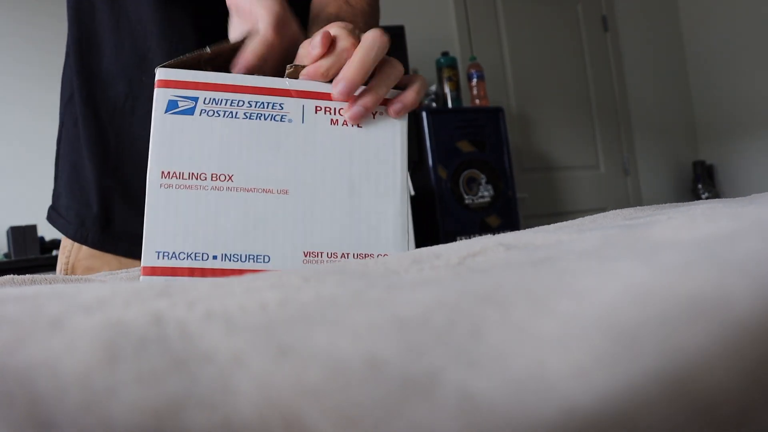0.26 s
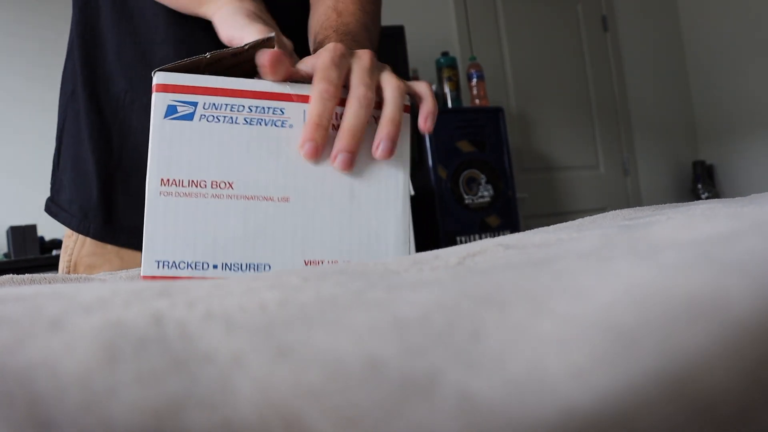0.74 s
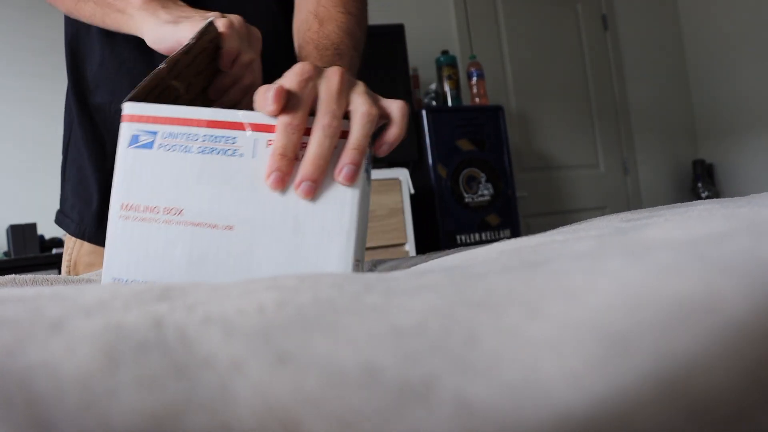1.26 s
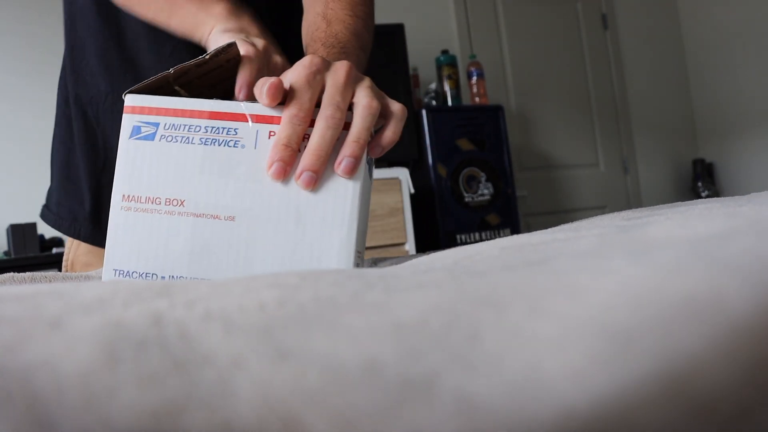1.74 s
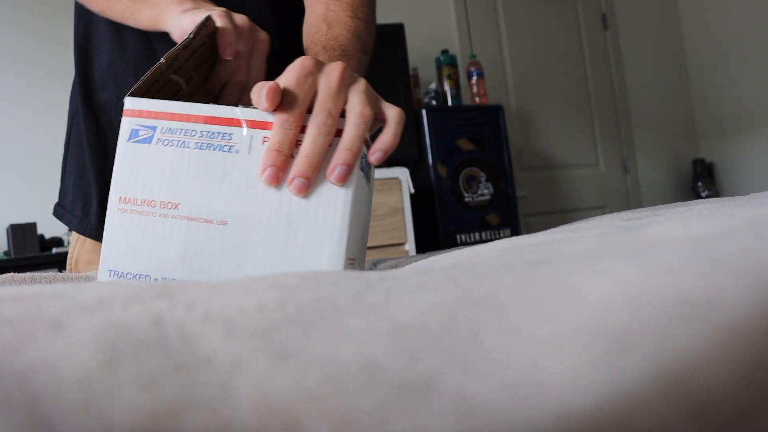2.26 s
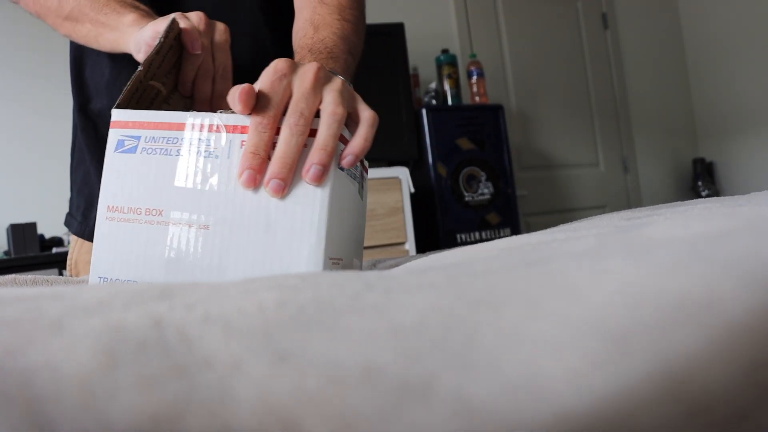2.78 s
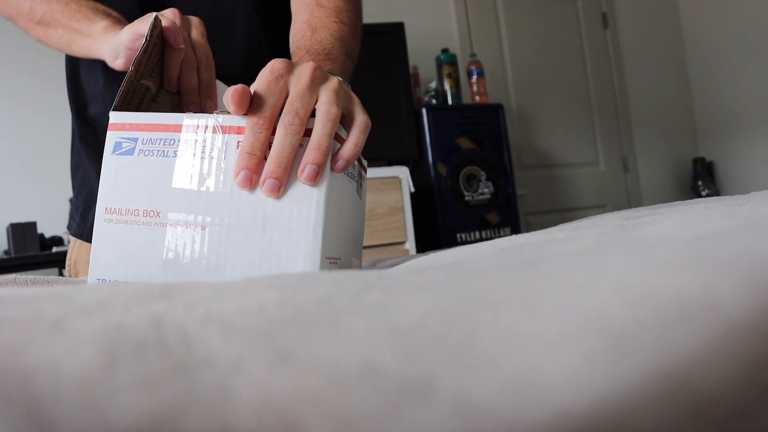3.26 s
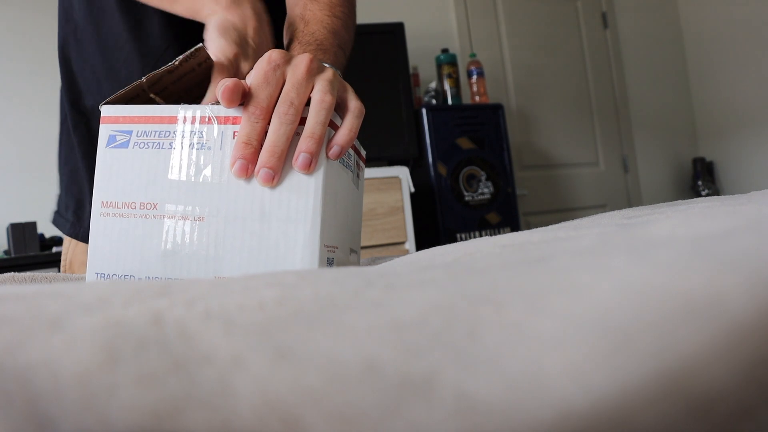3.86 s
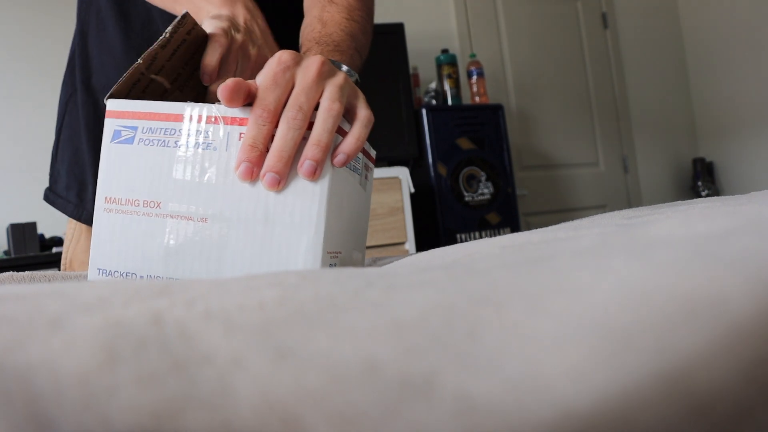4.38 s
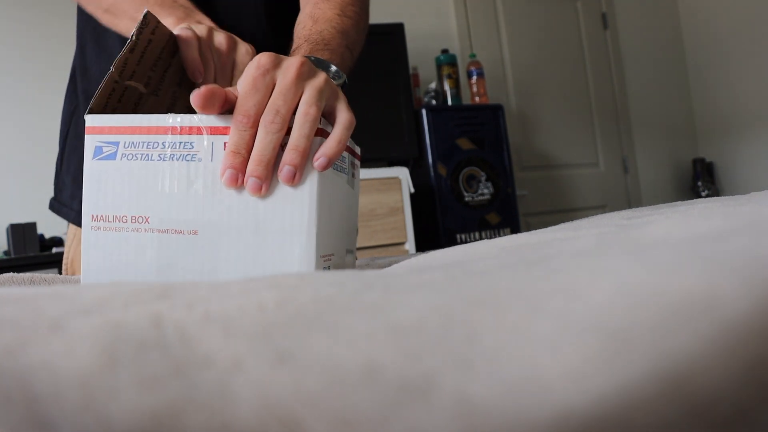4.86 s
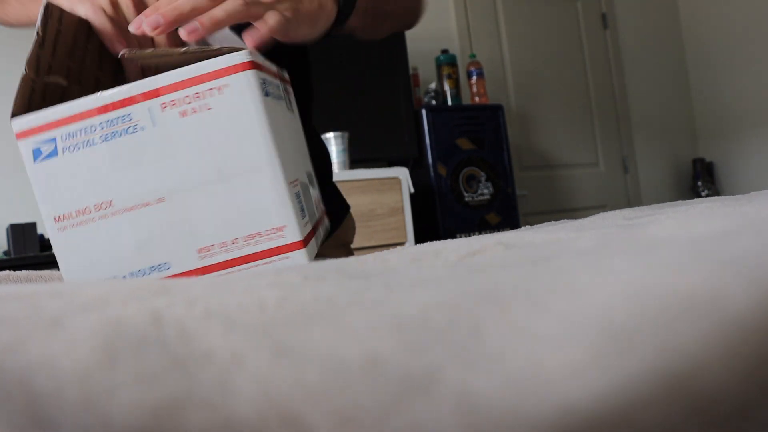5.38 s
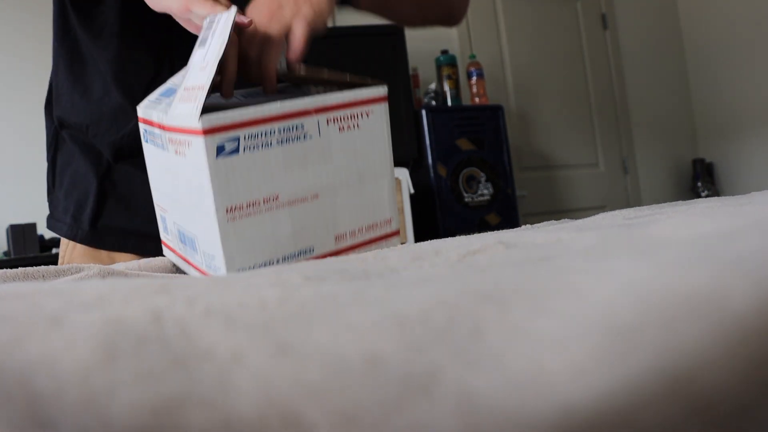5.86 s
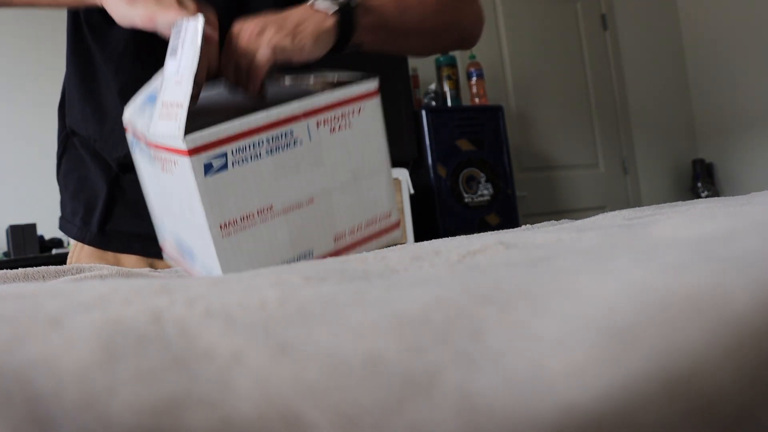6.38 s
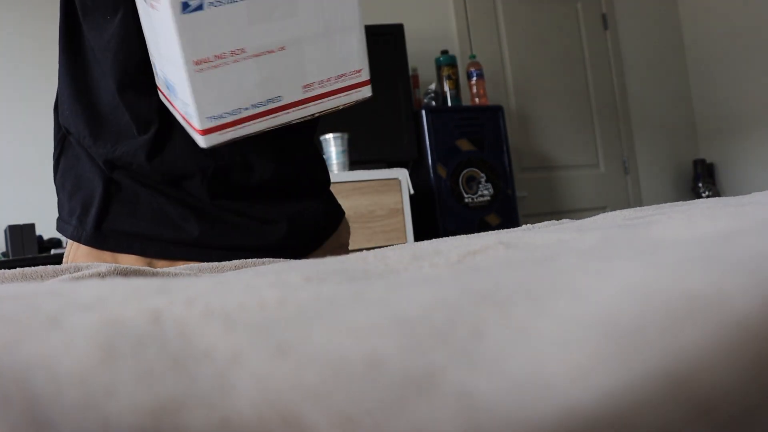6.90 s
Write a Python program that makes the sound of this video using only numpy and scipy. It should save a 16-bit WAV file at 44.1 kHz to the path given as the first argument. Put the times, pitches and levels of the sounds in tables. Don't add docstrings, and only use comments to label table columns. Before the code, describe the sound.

Glued cardboard flaps pop and tear loose in loud bursts, then quieter fumbling, small squeaks and faint rustles follow in a close bedroom setting.

```python
import sys
import numpy as np
from scipy import signal
from scipy.fft import rfft, irfft, next_fast_len
from scipy.io import wavfile

SR = 44100
rng = np.random.default_rng(int(sys.argv[2]) if len(sys.argv) > 2 else 0)


def convert_level_to_amplitude(level_db):
    exponent = np.asarray(level_db, float) / 20
    return 10 ** exponent


def master_out(mix):
    frames = np.transpose(np.atleast_2d(mix))
    ceiling = np.clip(frames, -1, 1)
    pcm = np.round(ceiling * 32767).astype(np.int16)
    wavfile.write(sys.argv[1], SR, pcm)


N = 314725

# time in seconds, peak level in dB, ring of the sheet in Hz,
# knock of the box in relative dB, broad crack in relative dB.
FIRST_FLAP_RELEASES = [(.0495, -17, 3560, -17, -12), (.153, -5, 3630, -21.5, 3),
                       (.195, -2, 5300, -26, -0.5), (.2075, -8, 9604, -11.5, 0), (.502, -10, 950, -8, 0),
                       (.881, -19, 4000, -12.5, 3), (1.149, -7, 5950, -25, 0), (1.164, -23, 2830, -18, -11),
                       (1.176, 0, 2750, -4.5, 6), (1.181, 1.5, 6800, -12.5, -28),
                       (1.19, -2, 2300, -66, -22), (1.196, 9, 6000, -22, -25), (1.202, -13, 2075, -40.5, 3),
                       (1.212, -3.5, 2930, -24, 6), (1.271, 3, 5280, -16, -4), (1.429, -17.5, 1310, -14, 3),
                       (1.443, -19.5, 830, -9, 3), (1.593, -17, 4540, -23, -28),
                       (1.939, -4.5, 4540, -20.5, -1.5)]
# time in seconds, peak level in dB, ring in Hz,
# knock in relative dB, crack in relative dB.
LONG_SEAM_RELEASES = [(2.307, -15, 5290, -15.5, -11.5), (2.319, -10.5, 4500, -19, 0.5),
                      (2.385, 1.5, 5100, -18, -5), (2.415, -6.5, 3380, -11.5, -30),
                      (2.429, 2.1, 3120, -14.5, -8.5), (2.48, -11.5, 4460, -19, -14),
                      (2.489, 3.5, 4600, -16.5, -12.5), (2.502, -9.5, 2220, -44, 2),
                      (2.648, 2, 5260, -9, -3), (2.773, 3, 3100, -11.5, -4.5), (2.817, -2, 3000, -10, 1),
                      (2.968, 4, 4800, -15.5, -36.5), (3.074, 4.5, 3220, -8, -9.3),
                      (3.399, 1.3, 2100, -6.5, 1.8), (3.544, -19, 1430, 0, -24.5),
                      (3.591, -17, 3100, -7.5, -20.5)]
# time in seconds, peak level in dB, ring in Hz,
# knock in relative dB, crack in relative dB.
LAST_SPOT_RELEASES = [(4.085, -21, 634, -21, 7), (4.261, -15, 4700, -37, -7), (4.281, -1, 3860, -36, -9),
                      (4.304, -19.5, 4000, 2, -39), (4.723, -9.5, 2340, -24, -8),
                      (4.797, -7, 6200, -10.5, -30), (4.868, -11, 4600, -5, 5), (4.947, -22, 5130, -40, 2),
                      (4.96, -22, 3160, -7.5, 3), (5.836, -19, 2930, -2.5, -12),
                      (5.97, -15.5, 4460, -13, -5), (6.047, -17, 690, -28, 6), (6.171, -21, 1230, -34, -1)]
# time in seconds, peak level in dB, ring in Hz,
# crack in relative dB.
WALL_BUMPS = [(0.122, -31.5, 740, -12), (0.351, -28, 900, -17), (0.48, -29, 700, -5),
              (0.794, -33.5, 1120, 7), (.868, -31, 746, 11), (.941, -22.5, 590, -11),
              (0.985, -27, 890, -10), (1.086, -20, 600, -24), (1.103, -20.5, 635, -3.5),
              (1.558, -36, 646, 5), (1.743, -20, 600, -6), (1.841, -26.5, 670, -6), (3.722, -30, 750, -3),
              (3.783, -39, 630, -12), (3.871, -28.5, 626, -6), (3.998, -28, 635, -14),
              (4.144, -24.5, 694, -5), (4.197, -32, 700, 3), (4.419, -28, 730, -19.5),
              (4.468, -32, 730, -15), (4.574, -25.5, 1370, -4), (4.588, -17, 610, -11),
              (4.613, -19.5, 2600, -6), (5.143, -26, 594, -2), (5.217, -20.5, 686, -9),
              (5.31, -27, 700, -5), (5.356, -25, 3570, 2), (6.141, -24, 720, -5.5), (6.29, -33, 640, -6),
              (6.347, -35.5, 613, 3)]
# time in seconds, peak level in dB, ring in Hz.
TAPE_CRACKLES = [(.645, -31, 4000), (.67, -44, 5950), (.711, -37, 6000), (.736, -32, 3500),
                 (.766, -39.5, 4500), (2.176, -29.5, 4000), (2.218, -35, 3280), (2.26, -27, 4130),
                 (2.284, -33, 4000), (3.642, -27, 4800), (3.688, -28, 4800), (3.76, -31, 6000),
                 (4.006, -24, 4000), (5.098, -44, 7000), (5.522, -35, 1500), (5.698, -32.5, 6000),
                 (6.667, -36, 1500), (6.745, -27, 5640), (6.905, -36, 3290), (7.006, -32, 3640),
                 (7.035, -33, 5970), (7.066, -26.5, 4430)]
# frequency in Hz, width in Hz, level in dB.
BOX_MODES = [(149.7, 28, 4), (260, 33.4, 6), (362.3, 75, 3), (460, 130, -0.5), (629, 40.5, 4),
             (722, 53, 0.5), (1009, 32, -4), (1110, 1020, -13.5)]
# frequency in Hz, width in Hz, level in dB.
SHEET_MODES = [(1400, 800, -7), (2300, 1000, -3), (3500, 1400, 0), (5200, 2000, -1), (7600, 2800, -3),
               (12000, 3500, -2)]
# time in seconds, peak level in dB,
# frequency in Hz, width in Hz.
PANEL_RINGS = [(.352, -23.5, 557, 340), (.353, -24, 188, 170), (0.5046, -14, 900, 450),
               (0.507, -28.5, 110, 59), (1.18, -31.5, 90, 56), (1.188, -24.5, 2000, 280),
               (1.745, -32.5, 130, 31), (1.942, -8.5, 2450, 750), (2.649, -37, 320, 31),
               (2.777, -31, 345, 17), (2.776, -9, 2000, 600), (2.973, -32.5, 362, 20),
               (2.969, -11, 900, 460), (3.077, -44, 340, 52), (3.402, -10, 1200, 250),
               (3.412, -21, 1150, 60), (3.413, -20, 1300, 70), (2.3868, -9, 3100, 900),
               (3.104, -17, 560, 250), (4.474, -32, 420, 200), (5.101, -34, 250, 150),
               (3.403, -21, 100, 120), (3.402, -15, 480, 300), (3.402, -13, 890, 320),
               (.505, -12.5, 260, 123), (1.744, -22, 302, 110), (4.726, -28, 2400, 400),
               (5.371, -31, 655, 28), (5.372, -38, 1500, 80), (6.05, -30, 130, 70)]
# time in seconds, peak level in dB, frequency in Hz, width in Hz.
DRY_RINGS = [(.0512, -13, 3500, 600), (.0512, -15, 6800, 1500), (.1538, -16, 4000, 3000),
             (.155, -1, 11500, 2500), (.1585, -12, 6000, 5000), (.175, -22, 9000, 5000),
             (.1975, -8, 6500, 2500), (.2092, -6, 9000, 3000), (.4808, -24, 6000, 5000),
             (.8046, -38, 4000, 2000), (1.8916, -38, 4000, 2000), (2.1555, -38, 4000, 2000),
             (3.5925, -16, 3300, 300), (3.729, -29, 6000, 3000), (3.735, -30, 5500, 3000),
             (3.8182, -28, 9000, 5000), (3.828, -30, 2600, 600), (4.021, -33, 7000, 4000),
             (4.054, -36, 9000, 4000), (4.082, -26, 4000, 2500), (4.087, -19, 3800, 900),
             (4.269, -24, 4500, 2000), (4.4867, -33, 5000, 3000), (4.783, -34, 3500, 2000),
             (4.809, -22, 6000, 4000), (6.337, -40, 7000, 3000), (6.3485, -36, 5500, 3000),
             (6.598, -39, 6000, 2500), (6.62, -42, 7000, 4000), (6.71, -40, 2000, 2000),
             (6.738, -40, 2000, 2000), (6.778, -42, 3000, 2500), (6.8473, -42, 5000, 1000),
             (6.8942, -38, 5000, 3000), (6.985, -39, 5000, 700), (7.0878, -32, 5000, 3000),
             (.5048, -5, 900, 600), (.5045, -7, 9000, 5000), (1.2725, -7, 5500, 3000),
             (1.5945, -21, 5500, 2000), (1.7445, -30, 2500, 700), (2.365, -28, 2200, 500),
             (2.4905, -3, 4500, 3000), (2.9692, -4, 3500, 3000), (3.0972, -9, 3000, 1500),
             (3.1215, -7, 3000, 1500), (4.3075, -10, 4000, 3500), (4.571, -31, 4000, 2500),
             (6.0495, -22, 4800, 1200), (6.098, -35, 4500, 2500)]
# start in seconds, length in seconds, level in dB.
SEAM_TEARS = [
    (1.176, 0.05, -13.5),
    (3.085, 0.069, -9.5),
    (4.283, 0.07, -28),
]
# time in seconds, level in dB.
GRIP_LEVEL = [(0.0, -45), (0.44, -56), (0.63, -59.5), (0.91, -52), (1.11, -46.5), (2.24, -57.5),
              (2.56, -51.5), (2.98, -49.5), (3.2, -49.5), (3.45, -58), (3.61, -48), (4.37, -54),
              (5.14, -58.5), (5.26, -48), (5.62, -61), (6.19, -47.5), (6.35, -56.5), (7.13, -59)]
# start in seconds, length in seconds,
# scrape level in dB, rustle level in dB.
HAND_STROKES = [(0, 0.042, -45.5, -45), (.19, 0.2, -42.5, -52), (.4, 0.19, -51.5, -48.5),
                (.62, 0.094, -53, -46), (.84, 0.13, -48, -45), (.975, 0.09, -43, -48),
                (1.12, 0.31, -37, -43), (1.4, 0.15, -40, -68), (1.72, 0.3, -51, -80),
                (2.375, 0.21, -33.5, -30), (2.62, 0.4, -49, -42), (2.95, 0.16, -37, -41),
                (3.15, 0.31, -45.5, -49), (3.56, 0.1, -45, -42), (3.7, 0.11, -51.5, -58),
                (3.79, 0.2, -46, -58), (3.98, 0.46, -49.5, -72), (4.17, 0.12, -69, -49),
                (4.55, 0.19, -49, -76), (4.7, 0.56, -48.5, -44), (5.07, 0.2, -53, -52),
                (5.2, 0.25, -53.5, -47), (5.65, 0.35, -74, -59), (5.97, 0.07, -46, -69),
                (6.045, 0.08, -43, -60), (6.13, 0.045, -43, -60), (6.175, 0.07, -44, -60),
                (6.22, 0.28, -67, -56.5), (6.58, 0.17, -55.5, -53), (6.82, 0.18, -66, -51.5),
                (7.0, 0.31, -77, -51.5)]
# frequency in Hz, width in Hz, level in dB.
RUBBED_CARD_MODES = [(1100, 3000, -2), (2200, 770, 2.5), (4000, 2640, -1), (6000, 470, -9.5),
                     (12300, 4600, 5)]
# start in seconds, length in seconds, level in dB.
BLANKET_SHOVES = [(.975, 0.07, -40), (1.745, 0.11, -36), (3.72, 0.03, -39), (3.682, 0.05, -37),
                  (3.785, 0.07, -37), (3.87, 0.04, -41), (3.997, 0.05, -39), (4.086, 0.096, -36.5),
                  (4.197, 0.063, -37), (4.572, 0.052, -37), (5.09, 0.046, -44.5), (5.14, 0.045, -35),
                  (5.215, 0.042, -38), (6.135, 0.04, -35.5), (6.18, 0.04, -39), (6.69, 0.12, -48.5)]
# start in seconds, length in seconds, level in dB.
WALL_GROANS = [
    (2.65, 0.12, -40.5),
    (2.77, 0.22, -40),
    (2.96, .12, -48),
]
# start in seconds, length in seconds,
# level in dB, starting pitch in Hz, final pitch in Hz.
BLANKET_SLIDES = [
    (6.425, 0.065, -56, 3200, 2950),
    (6.48, 0.125, -50, 2950, 2720),
    (6.62, 0.05, -59, 2600, 2100),
    (6.655, 0.09, -56, 2700, 2720),
]
# start in seconds, length in seconds, level in dB.
FLAP_SQUEAKS = [
    (5.3, 0.037, -38),
    (5.35, 0.05, -38),
    (5.495, 0.071, -43.5),
    (6.03, 0.054, -34.5),
]
# frequency in Hz, width in Hz, level in dB.
FLAP_MODES = [(645, 35, 0), (1480, 80, -20), (2100, 120, -20)]
# delay in seconds, level in dB.
EARLY_ECHOES = [(.0022, -17), (.0092, -14), (0.0128, -12.5), (.0145, -21), (.023, -14)]
# frequency in Hz, t60 in seconds, level in dB.
ROOM_TAIL = [(100, 0.12, 4), (400, 0.32, -3.5), (1200, 0.29, 4), (2150, 0.27, 9.5), (4306, 0.48, -7),
             (8450, 0.28, 3.5), (13200, 0.26, -1)]
# frequency in Hz, likeness from 0 to 1.
STEREO_LIKENESS = [(60, 1), (300, 0.91), (1000, 0.4), (3000, 0.067), (12000, 0.017)]
# frequency in Hz, density in dB per Hz.
HUSH_SPECTRUM = [(15, -32.5), (45, -1.5), (229, 4), (330, -16.5), (1000, -32.5), (2700, -12.5),
                 (4500, -30.5), (16000, -40)]
# frequency in Hz, left minus right in dB.
PORT_SHADING = [(60, -1), (300, 2), (1000, -2.5), (3000, 1.5), (8000, -0.5), (13000, 7)]


def releases():
    zip_s = 3.084 + 0.0073 * np.arange(9)
    unzip = [(s, -1 - 418 * abs(s - 3.108), 3250, -7.5, -19) for s in zip_s]
    bumps = [(s, db, hz, -9, crack_db) for s, db, hz, crack_db in WALL_BUMPS]
    crackles = [(s, db, hz, -9, -7) for s, db, hz in TAPE_CRACKLES]
    return FIRST_FLAP_RELEASES + LONG_SEAM_RELEASES + LAST_SPOT_RELEASES + unzip + bumps + crackles


def snaps():
    burst_s, tick_decay_s = 0.0016, 0.0025
    out = np.zeros((2, N + 1026))
    t = np.arange(1024) / SR
    envelope = np.exp(-(t / burst_s) ** 2)
    fade = np.hanning(2048)[1024:]
    rows = releases()
    right_lags = rng.choice([0, 1, 1, 2], len(rows))
    noises = rng.standard_normal((len(rows), 2, 1024))
    for (s, peak_db, hz, knock_db, crack_db), noise, lag in zip(rows, noises, right_lags):
        burst, other = even_burst(noise, envelope)
        ring = min(hz / 3500, 1) ** 0.4 * peak_one(resonance(burst, hz, 0.5 * hz))
        crack = convert_level_to_amplitude(min(crack_db, 3)) * peak_one(body(other, SHEET_MODES))
        bright = peak_one(cut(burst, 8000, "high") * np.exp(-t / tick_decay_s))
        tick = convert_level_to_amplitude(-13 + 18 * np.log2(hz / 3500)) * bright
        thump = cut(burst, [280, 1500], "band") + 0.5 * body(other, BOX_MODES[2:])
        knock = convert_level_to_amplitude(knock_db) * peak_one(thump)
        snap = convert_level_to_amplitude(peak_db - 1.5) * blend(ring, crack, tick, knock) * fade
        at = round((s + 0.0015) * SR)
        out[0, at + 1:at + 1025] += snap
        out[1, at + lag:at + lag + 1024] += snap
    return out[:, :N]


def even_burst(noise, envelope):
    burst = noise * envelope
    for _ in range(3):
        lines = rfft(burst)
        flat = irfft(lines / (np.abs(lines) + 1e-9), noise.shape[-1])
        burst = flat * envelope ** 0.15
    return burst


def blend(*layers):
    lines = rfft(np.array(layers), 2048)
    whole = lines.sum(axis=0)
    power = np.sqrt(np.sum(np.abs(lines) ** 2, axis=0))
    return irfft(whole * (power / (np.abs(whole) + 1e-12)) ** 0.6)[:1024]


def rings(rows):
    out = np.zeros(N + 4096)
    push = np.eye(1, 4096)[0]
    for s, peak_db, hz, width_hz in rows:
        at = round(s * SR)
        ring = resonance(resonance(push, hz, width_hz), hz, 3 * width_hz)
        out[at:at + 4096] += convert_level_to_amplitude(peak_db) * peak_one(ring)
    return out[:N]


def tears():
    clicks = grains(820, spread_db=2.5, clump_db=4.5)
    ripping = body(clicks, SHEET_MODES) + 0.11 * body(clicks, BOX_MODES)
    return swells(SEAM_TEARS, 0.32) * rms_one(ripping)


def hands():
    grip_s, grip_db = np.transpose(GRIP_LEVEL)
    grip = convert_level_to_amplitude(np.interp(np.arange(N) / SR, grip_s, grip_db) + 1)
    bumps = grains(350, spread_db=4.0, clump_db=7.0)
    rumble = grip * rms_one(body(bumps, BOX_MODES))
    groan = swells(WALL_GROANS, 0.24) * rms_one(resonance(bumps, 345, 51))
    drag = grains(1500, spread_db=2.5, clump_db=3.0)
    shaken = body(drag, BOX_MODES[1:]) + 0.22 * cut(drag, [300, 950], "band")
    shoving = swells(BLANKET_SHOVES, 0.065) * rms_one(shaken)
    grit = grains(5000, spread_db=3.5, clump_db=7.0)
    scrape_gain = swells(HAND_STROKES, 0.26) + convert_level_to_amplitude(-6) * grip
    scrape = scrape_gain * rms_one(body(grit, RUBBED_CARD_MODES[:3]))
    crackly = cut(body(grit, RUBBED_CARD_MODES[3:]), 2000, "high")
    rustle = swells(HAND_STROKES, 0.26, axis=3) * rms_one(crackly)
    return rumble + shoving + groan + scrape + rustle + slides(grit)


def slides(grit):
    out = np.zeros(N)
    for s, length_s, level_db, from_hz, to_hz in BLANKET_SLIDES:
        at, size = round(s * SR), round(length_s * SR)
        band = rms_one(cut(grit[at - 2048:at + size], 160, "low")[2048:])
        phase = 2 * np.pi * np.cumsum(np.linspace(from_hz, to_hz, size)) / SR
        tone = np.sqrt(2) * np.sin(phase)
        gain = swells([(s, length_s, level_db)], 0.4)[at:at + size]
        out[at:at + size] += gain * band * tone
    return out


def squeak():
    slips = grains(600, spread_db=2.5, clump_db=2.0)
    return swells(FLAP_SQUEAKS, 0.5) * rms_one(body(slips, FLAP_MODES))


def ports(x):
    right_lag_s = 0.00003
    size = next_fast_len(N)
    hz = np.maximum(np.arange(size // 2 + 1) * SR / size, 1)
    half = convert_level_to_amplitude(at_hz(PORT_SHADING, hz) / 2) * np.exp(1j * np.pi * hz * right_lag_s)
    return irfft(rfft(x, size) * np.array([half, 1 / half]), size)[:, :N]


def bedroom(x):
    onset_s, build_s, tail_db = 0.0065, 0.0031, -5.5
    t = np.arange(SR // 2) / SR
    build = 1 - np.exp(-np.maximum(t - onset_s, 0) / build_s)
    tail = diffuse(len(t), lambda hz: convert_level_to_amplitude(at_hz(ROOM_TAIL, hz, axis=2) - 60 * t / at_hz(ROOM_TAIL, hz)))
    reply = convert_level_to_amplitude(tail_db) * rms_one(tail * build) / np.sqrt(len(t))
    skews_s = rng.uniform(-0.00018, 0.00029, len(EARLY_ECHOES))
    for (delay_s, echo_db), skew_s in zip(EARLY_ECHOES, skews_s):
        reply[0, round((delay_s + skew_s) * SR)] += convert_level_to_amplitude(echo_db)
        reply[1, round((delay_s - skew_s) * SR)] += convert_level_to_amplitude(echo_db)
    return signal.fftconvolve(x[None], reply, axes=1)[:, :N]


def room_hush():
    return convert_level_to_amplitude(-54) * rms_one(diffuse(N, lambda hz: convert_level_to_amplitude(at_hz(HUSH_SPECTRUM, hz))))


def diffuse(size, shape):
    out = 0
    edges_hz = 25 * 2 ** np.arange(0, 9.6, 0.5)
    white = rng.standard_normal((2, 2, size))
    for k, (low, high) in enumerate(zip(edges_hz, edges_hz[1:])):
        mid, side = cut(white[k % 2], [low, high], "band")
        hz = np.sqrt(low * high)
        alike = np.clip(at_hz(STEREO_LIKENESS, hz), 0, 1)
        stereo = np.sqrt(1 + alike) * mid + np.sqrt(1 - alike) * side * [[1], [-1]]
        out = out + shape(hz) * stereo
    return out


def grains(per_s, spread_db, clump_db):
    sizes = convert_level_to_amplitude(spread_db * np.minimum(rng.exponential(1, N), 5)) * rng.choice([-1, 1], N)
    chance = per_s * convert_level_to_amplitude(clump_db * drift(18)) / SR
    return sizes * (rng.random(N) < chance)


def drift(rate_hz):
    r = np.exp(-2 * np.pi * rate_hz / SR)
    noise = rng.standard_normal(N + SR)
    return rms_one(signal.lfilter([1], [1, -2 * r, r * r], noise)[SR:])


def swells(rows, rise, axis=2):
    out = np.zeros(N)
    for row in rows:
        start_s, length_s = row[:2]
        at = np.arange(max(int(start_s * SR), 0), min(int((start_s + length_s) * SR) + 1, N))
        part = (at / SR - start_s) / length_s
        ramp = np.minimum(part / rise, (1 - part) / (1 - rise))
        out[at] += convert_level_to_amplitude(row[axis]) * np.clip(ramp, 0, 1) ** 1.44
    return out


def body(x, modes):
    out = 0
    for k, (hz, width_hz, db) in enumerate(modes):
        out = out + (-1) ** k * convert_level_to_amplitude(db) * resonance(x + 1e-18, hz, width_hz)
    return out


def resonance(x, hz, width_hz):
    r = np.exp(-np.pi * width_hz / SR)
    zeros = np.array([1, 0, -1]) * (1 - r * r) / 2
    return signal.lfilter(zeros, [1, -2 * r * np.cos(2 * np.pi * hz / SR), r * r], x)


def cut(x, hz, kind):
    return signal.sosfilt(signal.butter(2, hz, kind, fs=SR, output="sos"), x)


def at_hz(points, hz, axis=1):
    points = np.array(points)
    return np.interp(np.log(hz), np.log(points[:, 0]), points[:, axis])


def rms_one(x):
    return x / np.sqrt(np.mean(x ** 2) + 1e-20)


def peak_one(x):
    return x / np.max(np.abs(x))


def scene():
    box = snaps() + rings(PANEL_RINGS) + tears() + squeak() + hands()
    dry_rings = rings(DRY_RINGS)
    into_room = box[0] + convert_level_to_amplitude(-9) * dry_rings
    return ports(box + dry_rings) + bedroom(into_room) + room_hush()


def low_pass(x):
    return signal.sosfilt(signal.butter(12, 16420, fs=SR, output="sos"), x)


def record(dry):
    hiss = convert_level_to_amplitude(-56) * resonance(rng.standard_normal(dry.shape), 12300, 2700)
    heard = np.clip(dry + hiss, -1, 1)
    steep = signal.cheby2(10, 50, 16300, fs=SR, output="sos")
    mix = np.clip(signal.sosfilt(steep, heard), -1, 1)
    return low_pass(mix)


dry = scene()
out = record(dry)
master_out(out)
```